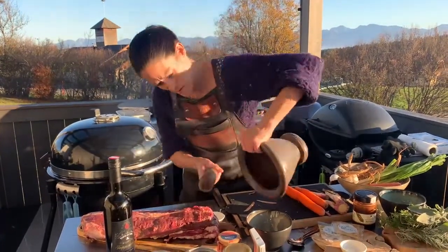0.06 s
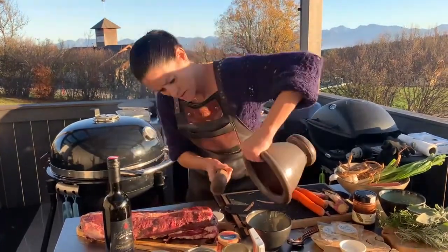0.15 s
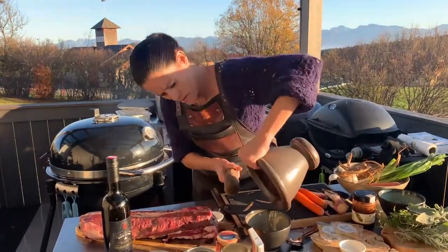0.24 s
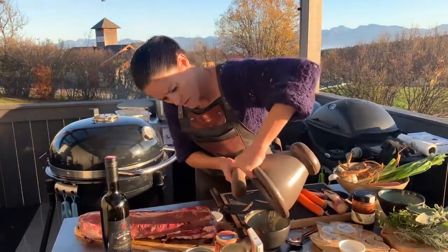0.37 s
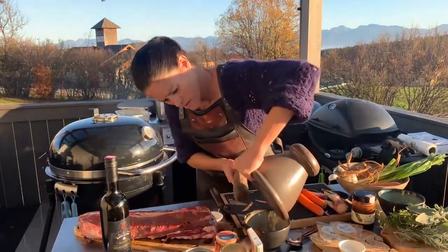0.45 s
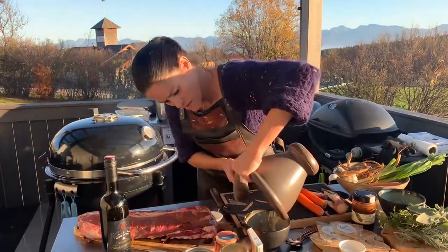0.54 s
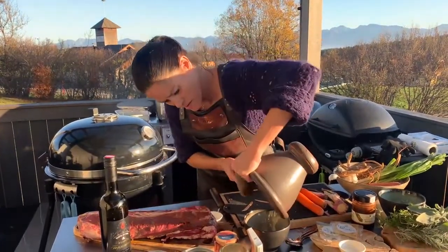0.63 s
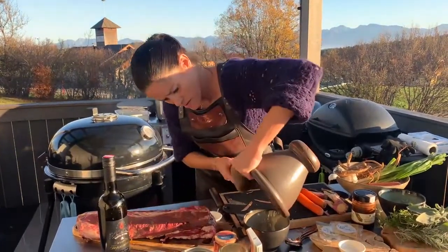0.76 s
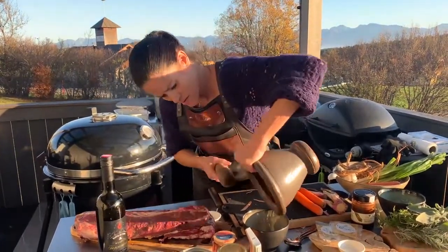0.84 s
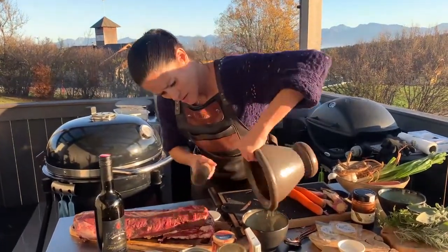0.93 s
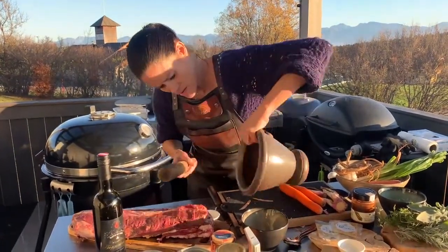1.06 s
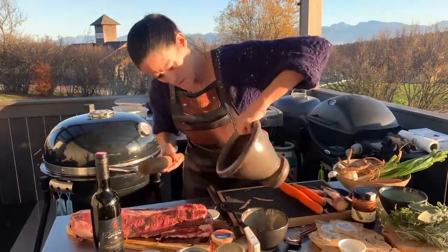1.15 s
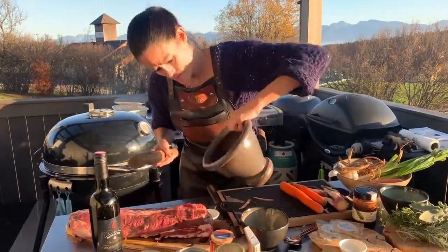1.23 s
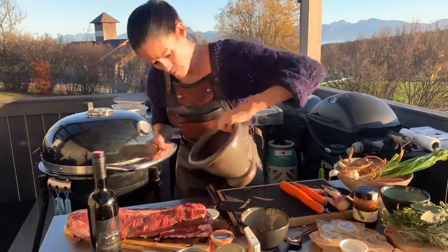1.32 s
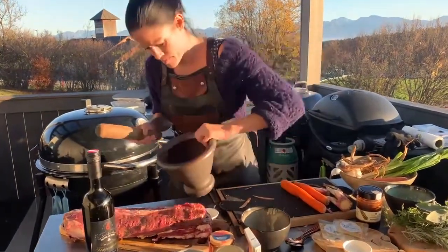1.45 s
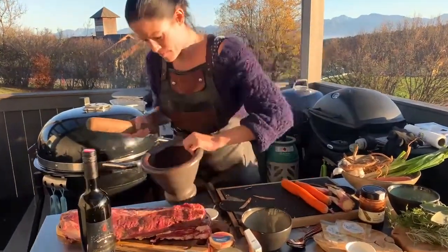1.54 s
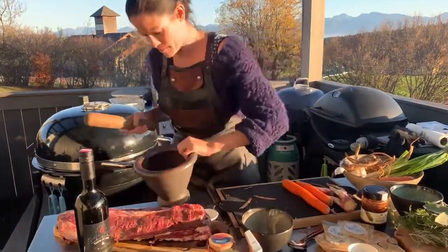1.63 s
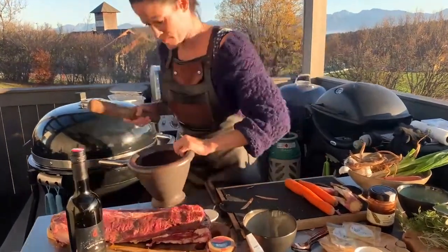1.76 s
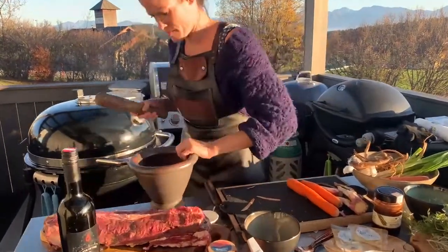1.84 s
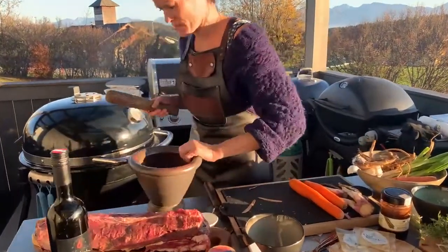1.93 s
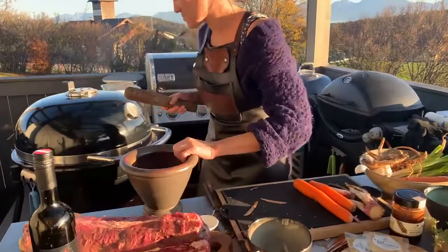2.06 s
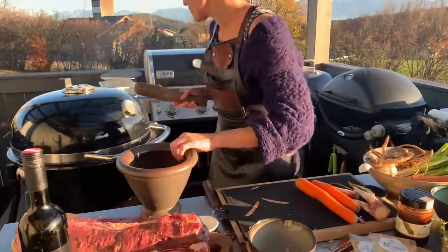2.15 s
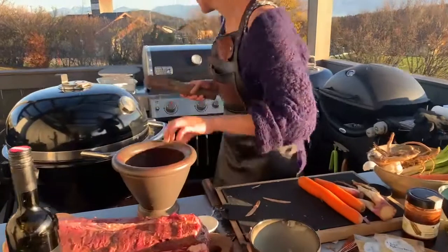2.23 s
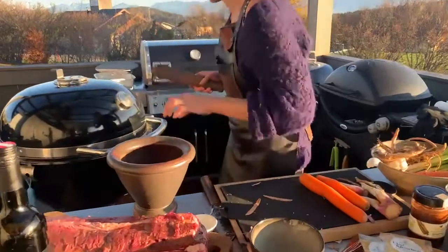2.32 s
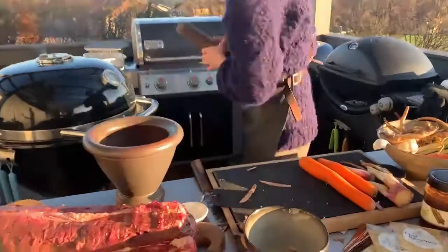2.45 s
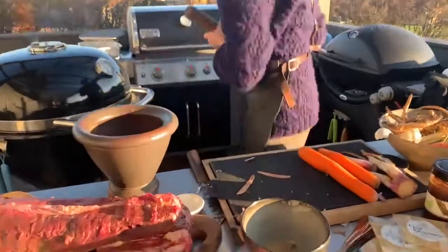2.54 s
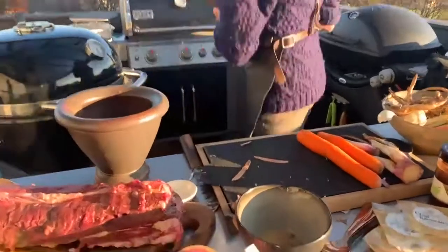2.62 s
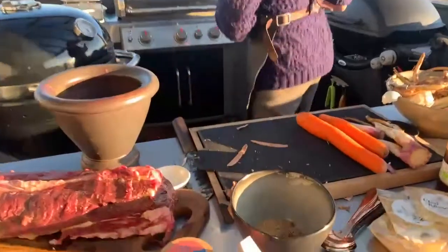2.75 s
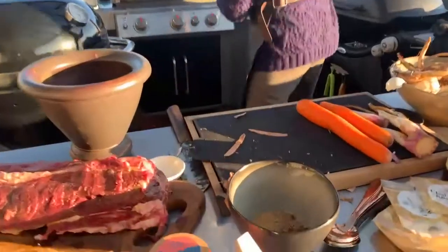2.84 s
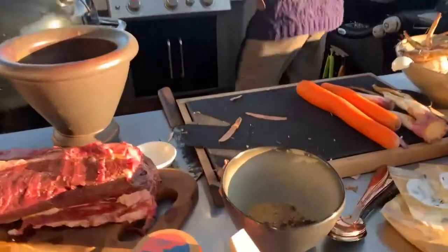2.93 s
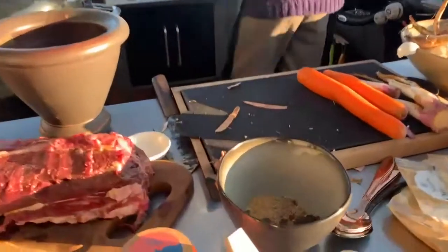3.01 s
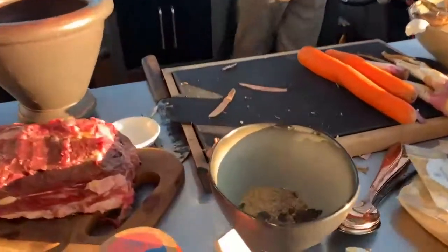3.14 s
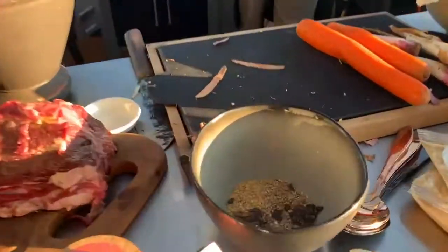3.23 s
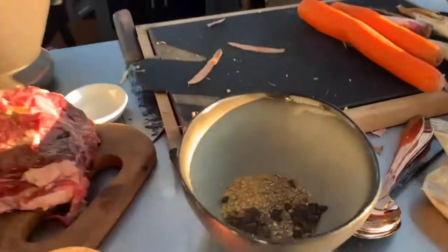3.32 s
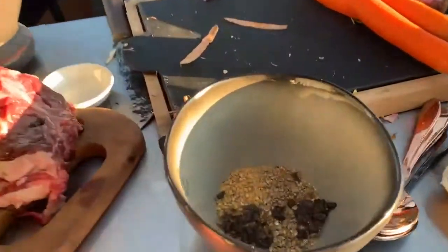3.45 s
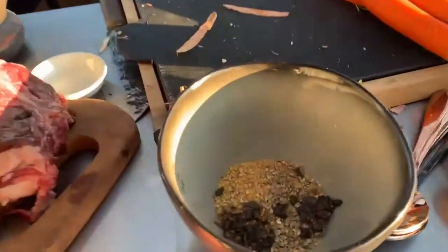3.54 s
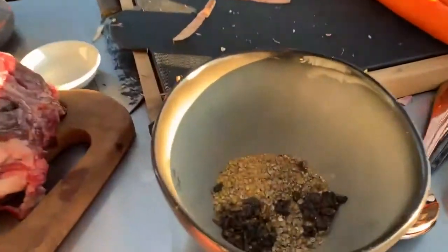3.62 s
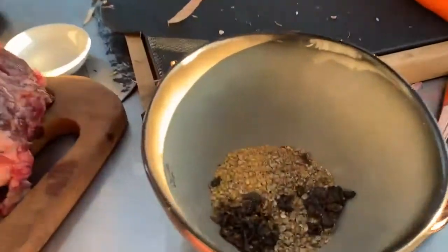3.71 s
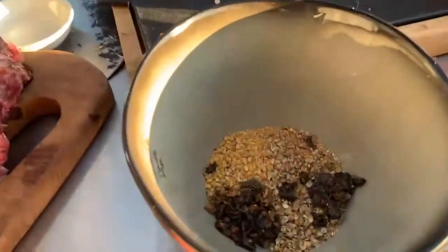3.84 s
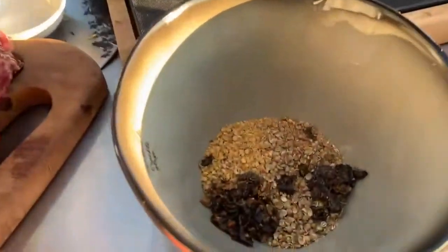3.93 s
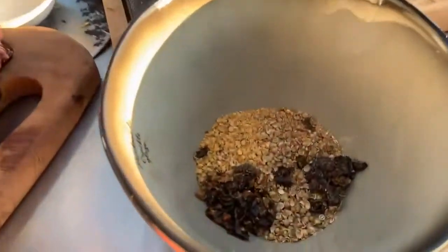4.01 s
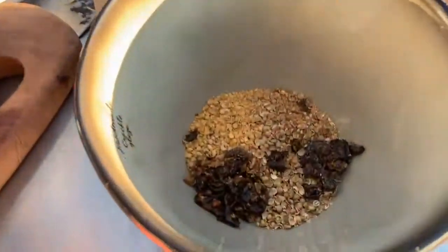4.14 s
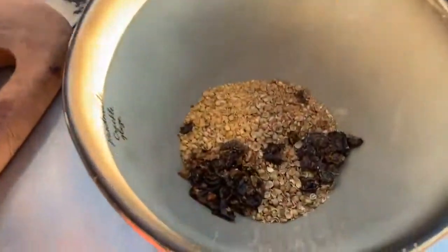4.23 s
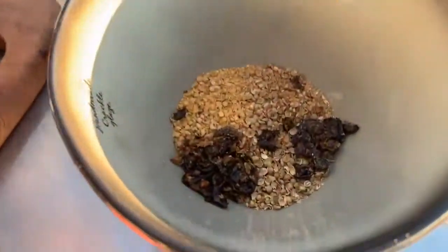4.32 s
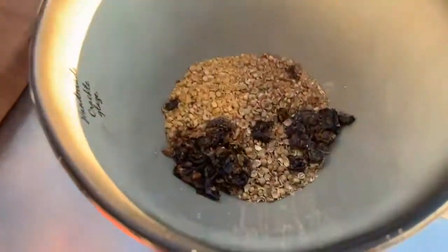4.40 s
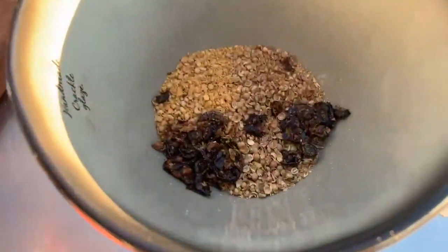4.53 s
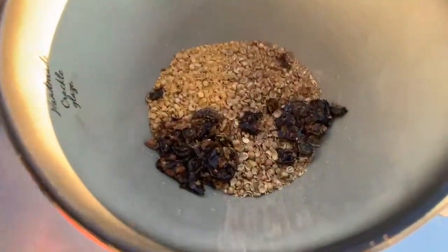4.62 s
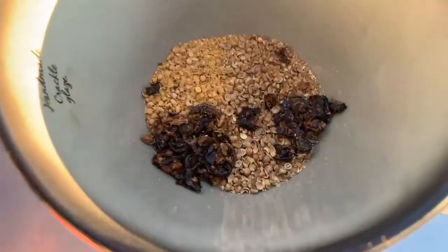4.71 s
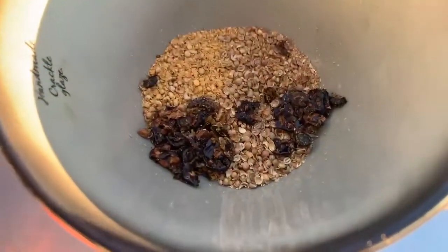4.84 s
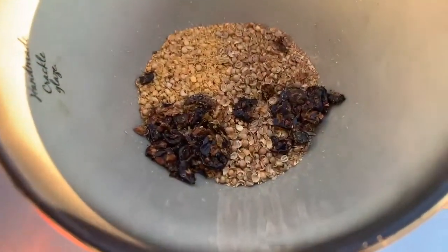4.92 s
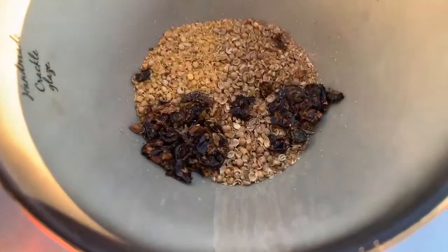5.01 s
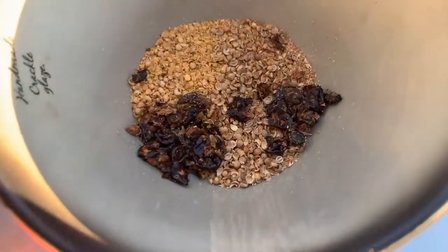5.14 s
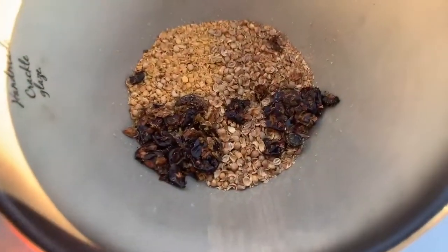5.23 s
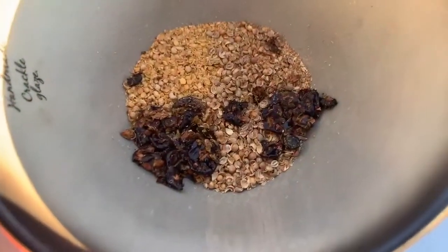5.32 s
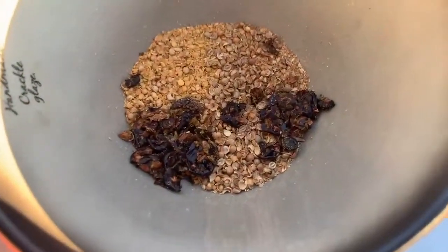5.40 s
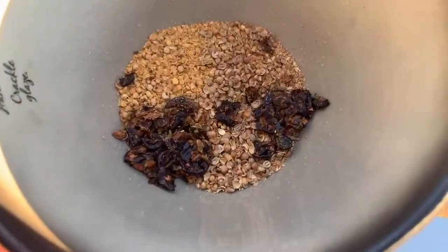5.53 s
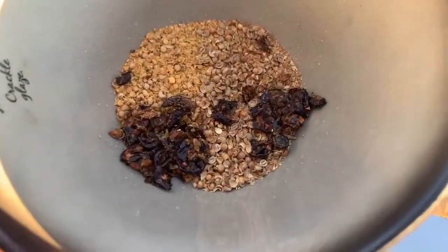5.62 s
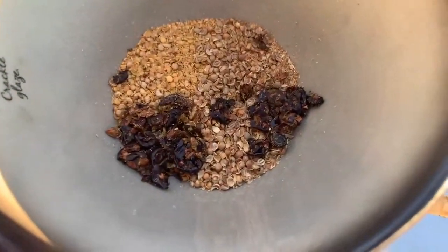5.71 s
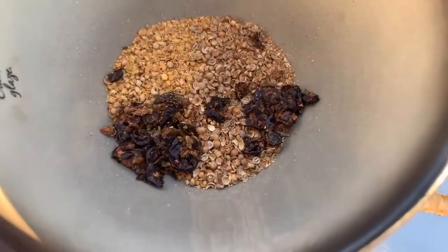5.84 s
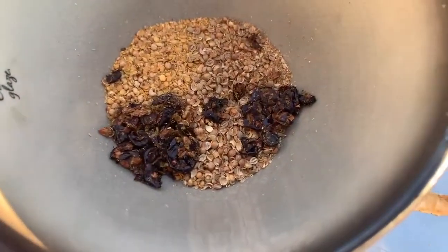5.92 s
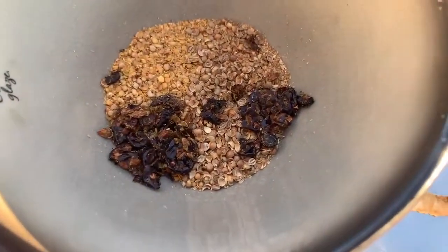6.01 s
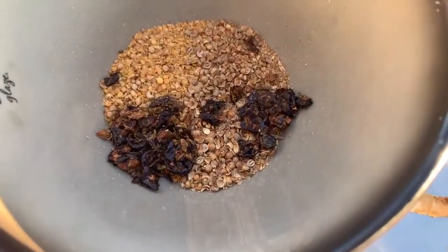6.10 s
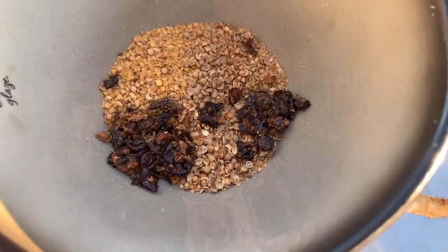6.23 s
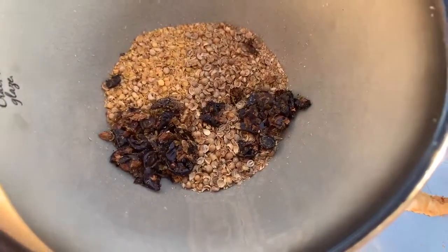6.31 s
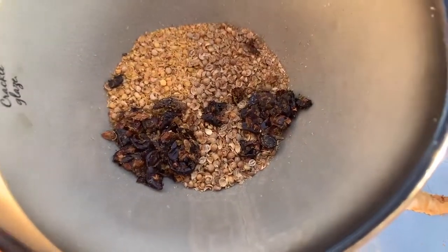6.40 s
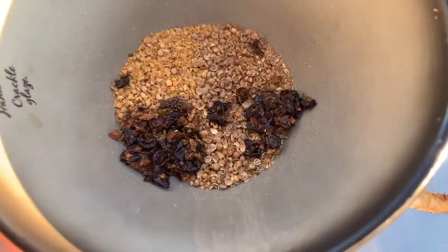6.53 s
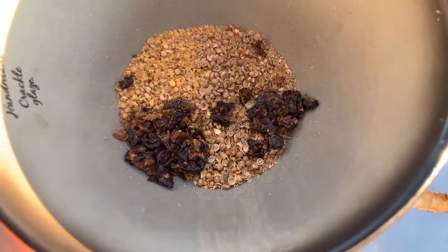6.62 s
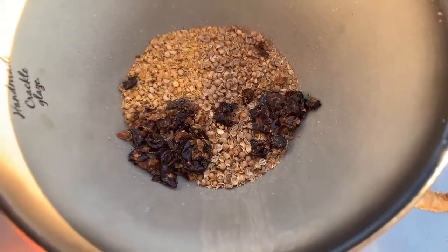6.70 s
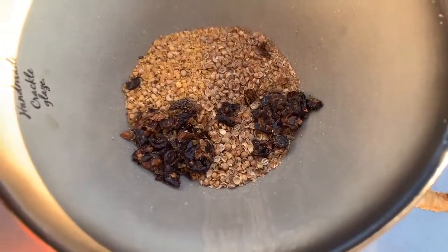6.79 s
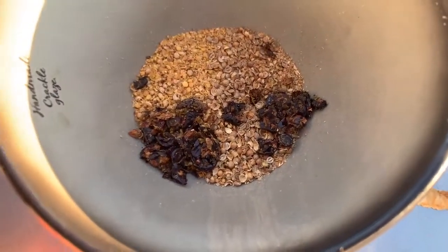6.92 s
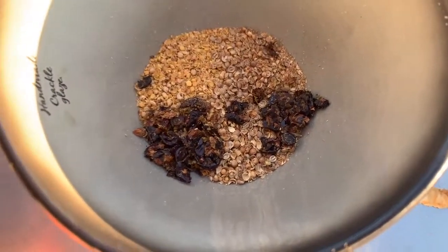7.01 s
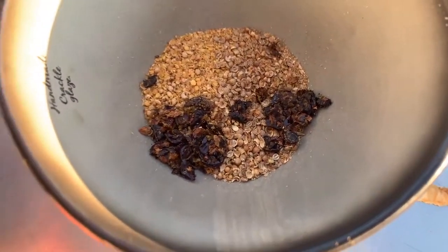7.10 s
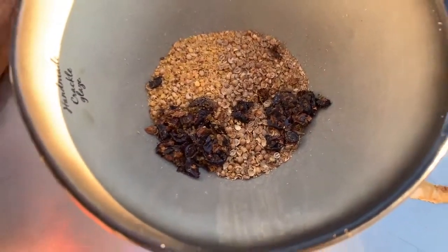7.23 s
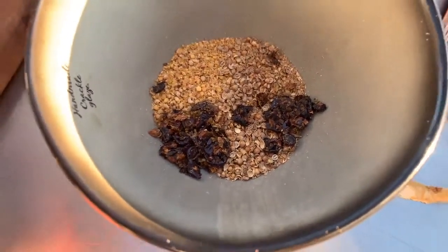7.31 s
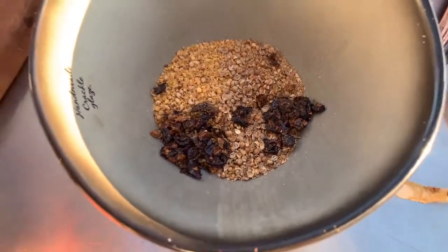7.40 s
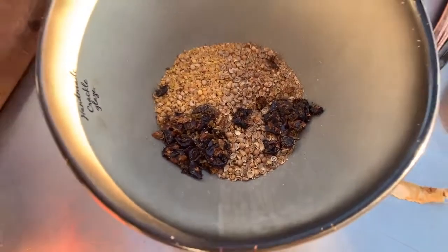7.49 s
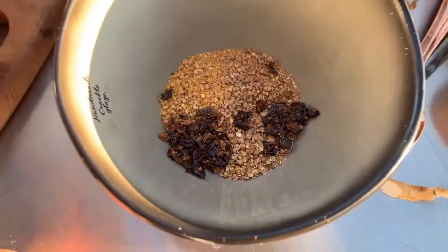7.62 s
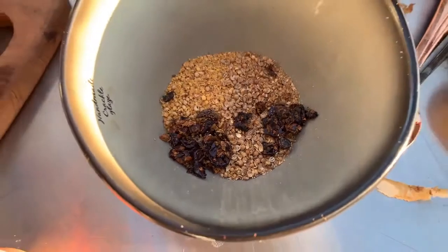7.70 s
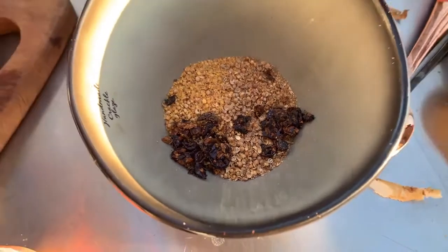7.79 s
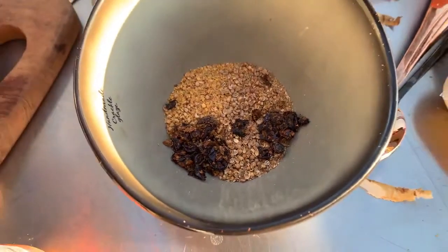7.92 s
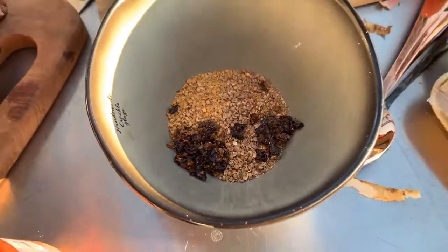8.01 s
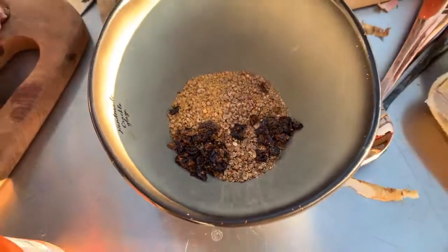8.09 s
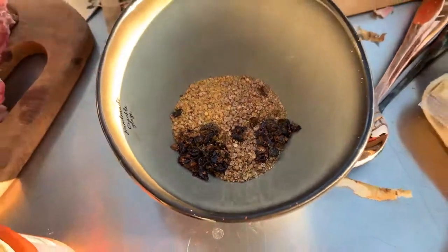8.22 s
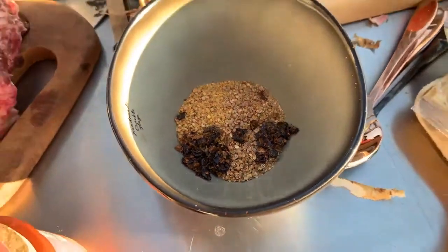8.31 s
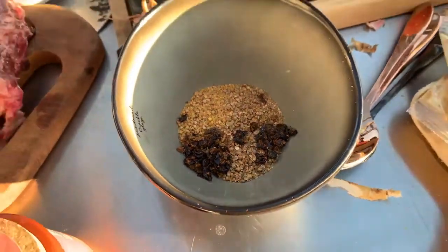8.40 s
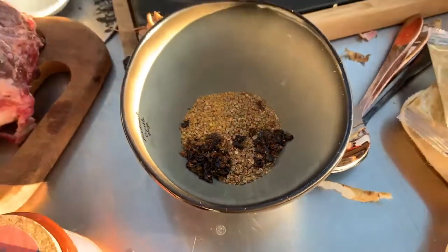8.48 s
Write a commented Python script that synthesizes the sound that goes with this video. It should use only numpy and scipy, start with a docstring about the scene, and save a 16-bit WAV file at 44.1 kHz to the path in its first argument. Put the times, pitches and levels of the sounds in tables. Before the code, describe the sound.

A pestle knocks loudly inside a stone mortar, stone grinds across a table, small clinks and footsteps follow, then quiet squealing rubs

```python
"""Stone mortar on a roofed deck

A pestle knocks ground spice out of a stone mortar over a bowl: hollow knocks with clacks and decaying modes.
The mortar is set down and dragged: swelling bursts of coloured noise scrape, while small things clink
as narrow noise bands and steps thud on the boards as dull ones. Then something near the microphone rubs
with a thin, fitful squeal of wavering tones and noise. A dull wash and hiss rise and fall in the background."""
import sys
import numpy as np
from scipy import signal
from scipy.fft import rfft, irfft, next_fast_len
from scipy.io import wavfile
from scipy.ndimage import uniform_filter1d, minimum_filter1d, map_coordinates

SR = 44100
rng = np.random.default_rng(int(sys.argv[2]) if len(sys.argv) > 2 else 0)


def dump_mix(stems):
    """Bounce the given channels to the path in sys.argv[1] as a 16-bit WAV at rate SR."""
    frames = np.atleast_2d(stems).T  # one column per channel
    limited = np.clip(frames, -1, 1)  # hard clip at full scale
    pcm = np.round(limited * 32767).astype(np.int16)
    wavfile.write(sys.argv[1], SR, pcm)


N = 377143
T = np.arange(SR) / SR  # time axis of one event, s

# background that swells after the louder sounds and with the handling, before trims:
# t/s, level of the dull wash/dB, level of the hiss/dB
BACKGROUND_LEVELS = [(0, -70.5, -92.5), (0.8, -68, -86), (0.98, -62.5, -83), (1.22, -72, -94.5),
                     (1.5, -62, -80), (2.22, -56, -79.5), (2.5, -65.5, -84.5), (2.8, -56, -81.5),
                     (3.08, -69, -92), (4.25, -58, -76.5), (4.55, -68, -87), (4.95, -71.5, -93),
                     (5.35, -64, -81.5), (6.35, -70.5, -88.5), (7.0, -62, -74.5), (7.72, -72, -90),
                     (8.25, -63.5, -77.5), (8.55, -65, -84)]
# spectrum of the dull wash: f/Hz, level/dB
WASH_SPECTRUM = [(15, -68), (25, -35.5), (91, -21.5), (186, -3.5), (256, -6.5), (328, -0.5), (403, -4.5),
                 (567, -3.5), (945, -12), (1020, -11.5), (1410, -15.5), (1640, -10.5), (2010, -17.5),
                 (2300, -25), (2990, -52.5), (5060, -120)]
# spectrum of the hiss: f/Hz, level/dB
HISS_SPECTRUM = [(1500, -2.5), (2500, 8), (4000, 3.5), (7000, -2), (10000, -12), (15000, -19.5)]

# knocks over the bowl: t/s, level/dB, low-pass corner set by hardness f/Hz, ring trim/dB, clack trim/dB
KNOCKS = [(0.373, -14, 4000, -0.5, -6.5), (0.514, -33.5, 7500, 3, 1), (0.526, -6, 7650, 0, 1),
          (0.563, -16, 3900, 0.5, -0.5), (0.706, -20.5, 920, -8.5, -10)]
# modes that ring after each knock: f/Hz, level/dB, t60/s
STONE_MODES = [(495.2, -8, 0.29), (591.9, -3.5, .21), (672, -13, 0.19), (777.5, -13.5, .26),
               (997, -22, .22), (1161, -8.5, 0.17), (1294, -2, 0.2), (1364, -1, .24), (1461, -14, 0.23),
               (1580, -6, 0.092), (1640, -4, 0.3), (1675, -7, 0.28), (1770, -12, 0.3), (2099, -26.5, 0.22),
               (3430, -23.5, 0.1), (4270, -26, 0.26), (4450, -26.5, .22), (5500, -31, .22)]
# spectrum of the clack: f/Hz, level/dB
CLACK_SPECTRUM = [(100, -40), (200, -25), (330, -16.5), (550, -0.5), (950, -8.5), (1350, 0.5), (1750, -3),
                  (2100, -20.5), (2800, -28.5), (4800, -36), (6200, -40), (8000, -41.5), (10000, -44),
                  (15000, -42)]
# decay of the clack: f/Hz, t60/s
CLACK_DECAY = [(200, 0.32), (700, .36), (1500, 0.3), (3000, 0.21), (6000, .2), (12000, 0.1)]
# clusters of high modes in the clack: f/Hz, full width at half the lift/Hz, lift/dB
HIGH_CLUSTERS = [(2380, 330, 5.5), (3330, 550, 12), (4260, 330, 18.5), (5510, 220, 16.5), (7324, 710, 7.5),
                 (8260, 170, 8.5)]

# brushing and scraping bands of noise: t/s, level/dB, centre f/Hz, width/octaves, rise/s, t60/s
BRUSH_EVENTS = [(0.938, -64.5, 2300, 1.04, .1, 0.29), (1.329, -64.5, 4000, 0.79, 0.07, 0.48),
                (1.99, -61, 9000, 0.89, 0.026, 0.092), (3.138, -49, 6950, 1, 0.037, 0.19),
                (3.31, -70, 5000, 0.87, 0.078, 0.27), (3.645, -33.5, 2880, 0.59, 0.033, 0.23),
                (3.87, -58, 2500, 1.18, 0.027, 0.46), (4.146, -40, 3010, 0.82, 0.023, 0.33),
                (6.93, -62, 3580, 0.95, 0.096, 0.27)]
# small utensils clink: t/s, level/dB, centre f/Hz, width/octaves, t60/s
CLINK_EVENTS = [(1.995, -42.5, 2400, .07, .17), (2.037, -43.5, 1990, 0.042, 0.24),
                (2.055, -53.5, 3730, 0.026, .25), (2.694, -47.5, 5980, 0.21, 0.022),
                (2.757, -52.5, 1810, 0.15, 0.37), (3.94, -54.5, 3260, 0.042, .12),
                (3.967, -47, 3550, .061, .025), (4.15, -40, 2480, .08, .06)]
# light bumps on the table top: t/s, level/dB, centre f/Hz, width/octaves, rise/s, t60/s
BUMP_EVENTS = [(1.997, -39, 510, 0.29, 0.0035, 0.39), (3.141, -54.5, 600, 1.13, 0.022, .8),
               (3.968, -44.5, 754, .6, .0016, 0.097), (4.101, -54, 1200, .7, 0.0016, 0.045),
               (4.179, -40.5, 724, 0.42, 0.018, 0.36)]
# something squeaks on the table: t/s, level/dB, rise/s
SQUEAK_EVENTS = [(2.39, -78, 0.032), (2.53, -70.5, 0.11)]
CLINK_RISE_S = 0.0034
BRUSH_EDGE = 3.4  # how steeply the band of a brush ends (2 = a bell)
SQUEAK_HZ, SQUEAK_OCTAVES, SQUEAK_T60_S = 7510, .02, 0.3

# heavy things scrape on the table:
# t/s, level/dB, rise/s, hold/s, reference t60/s, tilt/dB per octave, midrange lift/dB
SCRAPE_EVENTS = [(1.506, -16, 0.025, 0.0028, 0.33, 0, 2), (1.68, -16.5, 0.026, 0.0081, 0.37, 0.67, -0.5),
                 (1.744, -27, 0.015, 0.048, 0.22, -2.04, 0), (1.97, -39, 0.00097, 0.00086, 0.089, -4, -9),
                 (1.985, -39, 0.0088, 0.018, 0.23, -2.5, -9), (2.038, -45.5, 0.0031, 0.0065, 0.46, -4, -6),
                 (3.636, -29.5, 0.031, 0.0069, 0.24, 1.53, -14.5)]
# spectrum of the grit: f/Hz, level/dB
GRIT_SPECTRUM = [(29, -74), (50, -42), (166, -12.5), (282, -7), (367, -7), (637, -3.5), (701, -10.5),
                 (753, -7), (829, -8), (1920, -9.5), (3580, -16.5), (4560, -20), (6230, -24), (12500, -33),
                 (15500, -37.5)]
# how long the grit lasts: f/Hz, share of the reference t60
GRIT_DECAY_SHARE = [(150, 1.6), (500, 1.04), (1500, 0.95), (4000, 0.92), (12000, .75)]
# modes of the table: f/Hz, full width at half the lift/Hz, lift/dB
TABLE_MODES = [(181, 16, 1.5), (234, 41, 5.5), (284, 13, 6), (553.7, 89, 0.5), (1379, 39, 1.5),
               (1920, 44, 5.5), (3050, 94, 4), (4090, 53, 7.5)]

# thuds on the deck: t/s, level/dB, corner f/Hz, t60/s, boom relative to level/dB, boom corner f/Hz
THUD_EVENTS = [(2.518, -38.5, 300, 0.16, -9, 300), (2.609, -34.5, 804, 0.16, -2, 280),
               (2.715, -48, 400, 0.1, -19, 210), (3.235, -37, 855, 0.15, -10, 250),
               (3.655, -35, 496.7, 0.16, -5, 170), (4.19, -47.5, 520, 0.48, -13, 300),
               (7.949, -57.5, 117, 0.11, -20, 110), (8.128, -41.5, 480, 0.24, 3.5, 112)]
# spectrum of the boards: f/Hz, level/dB
BOARD_SPECTRUM = [(25, -67), (60, -33), (130, -3.5), (260, 2), (450, 3), (900, 1), (3000, -2)]
BOOM_DELAY_S, BOOM_T60_S = .011, .2  # the joists answer just after the boards

# strokes of the rubbing, before trims:
# t/s, length/s, low ring level/dB, middle ring level/dB, high ring level/dB, rasp level/dB
RUB_STROKES = [(4.655, .015, -72, -71, -95, -108), (4.709, 0.049, -67.5, -62, -81, -108),
               (4.995, .04, -76.5, -68.5, -92, -108), (5.058, .04, -65, -48, -65, -99),
               (5.098, 0.027, -47, -48.5, -57, -97), (5.21, 0.017, -53.5, -73, -89, -106),
               (5.271, 0.088, -47.5, -56, -70.5, -102), (5.372, 0.056, -60, -53, -64.5, -98),
               (5.511, 0.018, -66.5, -52.5, -92, -103), (5.562, 0.064, -45.5, -53.5, -68.5, -93),
               (5.806, 0.034, -57, -68, -82, -106), (6.008, .055, -70, -56.5, -88, -94),
               (6.153, .045, -55.5, -54.5, -57, -93), (6.231, 0.017, -67, -58.5, -82, -102),
               (6.457, 0.039, -47.5, -67, -82, -92.5), (6.498, 0.048, -46, -49.5, -66, -77),
               (6.708, .105, -58, -54.5, -63, -74.5), (6.911, 0.074, -55, -56.5, -69.5, -77),
               (7.005, 0.041, -55.5, -56, -59, -90), (7.435, .012, -50.5, -61, -90, -105),
               (7.48, 0.1, -62.5, -58, -66.5, -93), (7.881, 0.11, -62, -50.5, -73.5, -96),
               (8.005, 0.025, -72, -64, -57, -75.5), (8.065, 0.083, -66.5, -64, -60.5, -70),
               (8.191, 0.031, -60.5, -41.5, -66, -68.5), (8.266, .03, -63, -67, -66, -88),
               (8.431, 0.082, -50, -52.5, -69.5, -86)]
# squealing resonances: f/Hz, waver scale/Hz, noise half-width/Hz, noise relative to the tone/dB
SQUEAL_RINGS = [(2731, 21.7, 90, -5), (4979, 26.2, 182, -6.5), (7600, 70, 183, 2)]
# bands of the dry rasp: f/Hz, full width at half gain/Hz, level before trims/dB
RASP_BANDS = [(6800, 2100, -2), (9280, 320, -6.5), (10570, 350, -8), (11600, 260, -0.5), (12900, 380, -3.5),
              (14650, 600, -8)]
GRIP_T60_S, RELEASE_T60_S = 0.066, 0.14  # a stroke takes hold and lets go
LIGHT_DB, APPROACH_T60_S, LINGER_T60_S = -22, 0.46, 3.05  # the light contact before and after it

TOP_HZ = 15750  # middle of the upper band edge


def amp(db):
    """Decibels to gain."""
    return 10 ** (np.asarray(db) / 20)


def unit(x):
    """Scaled to rms 1."""
    return x / np.sqrt(np.mean(x ** 2) + 1e-20)


def along(points, hz):
    """(Hz, value) points read on a log frequency axis."""
    f, v = np.transpose(points)
    return np.interp(np.log(hz + 1), np.log(f + 1), v)


def curves(rows):
    """One value per sample for each column after the time."""
    s, *cols = np.transpose(rows)
    return [np.interp(np.arange(N) / SR, s, c) for c in cols]


def wobble(rate, size=N):
    """A smooth random curve, rate knots a second."""
    knots = rng.standard_normal(int(size * rate / SR) + 4)
    return map_coordinates(knots, [np.arange(size) * rate / SR])


def noise(gain, size):
    """Noise of rms 1 coloured by a gain of frequency."""
    m = next_fast_len(size)
    spectrum = rfft(rng.standard_normal(m)) * gain(np.fft.rfftfreq(m, 1 / SR))
    return unit(irfft(spectrum, m)[:size])


def steady(x, span):
    """Evens out the chance swells of a noise that are slower than span seconds."""
    power = uniform_filter1d(x * x, max(int(span * SR), 2))
    return x / np.sqrt(np.abs(power) + 1e-9)


def dying(x, t60, wait):
    """After wait seconds each frequency of x dies with its own t60."""
    hz, t, z = signal.stft(x, SR, nperseg=256)
    fade = amp(-60 * np.maximum(t - wait, 0) / t60(hz)[:, None])
    return signal.istft(z * fade, SR, nperseg=256)[1][:len(x)]


def swell(rise):
    """An attack that grows as time squared to 1 in rise seconds."""
    return np.minimum(T / rise, 1) ** 2


def add(track, s, x):
    """Mixes x into the track at s seconds."""
    part = track[max(round(s * SR), 0):][:len(x)]
    part += x[:len(part)]


def lift(resonances, f):
    """The dB that (Hz, width, dB) resonances add at frequencies f."""
    return sum(db * np.exp2(-(2 * (f - hz) / width) ** 2) for hz, width, db in resonances)


def ripple(f, spacing_hz):
    """A random run of peaks and dips over frequency, for an uneven colour."""
    return map_coordinates(rng.standard_normal(2048), [f / spacing_hz], mode="mirror")


def high_pass(x, hz):
    """Takes away the bass below hz."""
    return signal.sosfilt(signal.butter(3, hz, "high", fs=SR, output="sos"), x)


def background(wash_trim_db=0.0, hiss_trim_db=5.0, drift_db=0.5):
    """A dull wash and a hiss above it that swell after the louder sounds and with the handling."""
    wash_db, hiss_db = curves(BACKGROUND_LEVELS)
    wash_gain = amp(wash_db + wash_trim_db + drift_db * wobble(11))
    wash = wash_gain * noise(lambda f: amp(along(WASH_SPECTRUM, f)), size=N)
    hiss = amp(hiss_db + hiss_trim_db) * noise(lambda f: amp(along(HISS_SPECTRUM, f)), size=N)
    return wash + hiss


def taps(ring_db=-3.5, clack_db=-5.5, knock_db=2, knock_hz=560, knock_t60=.036,
         echo_s=.0155, echo_db=-2, blur=.42, low_hz=210):
    """Each blow gives a hollow stone knock, a clack and a ring; each has its own treble corner."""
    out = np.zeros(N)
    hz, level, t60 = np.transpose(STONE_MODES)[:, :, None]
    for s, db, corner_hz, ring_trim_db, clack_trim_db in KNOCKS:
        start_phase = rng.uniform(0, 2 * np.pi, hz.shape)
        # reflections blur the phase of the modes, the high ones most
        drift = np.array([wobble(120, size=SR) for _ in STONE_MODES])
        phase = start_phase + blur * hz / 1500 * drift
        mode_gain = amp(level + rng.normal(0, 1, hz.shape) - 60 * T / t60)
        ring = (mode_gain * np.sin(2 * np.pi * hz * T + phase)).sum(0)
        burst = noise(lambda f: amp(along(CLACK_SPECTRUM, f) + lift(HIGH_CLUSTERS, f)), size=SR)
        clack = dying(steady(burst, .02), lambda f: along(CLACK_DECAY, f), 0)
        knock = amp(knock_db - 60 * T / knock_t60) * np.sin(2 * np.pi * knock_hz * T) * swell(0.0026)
        bright = amp(ring_db + ring_trim_db) * ring + amp(clack_db + clack_trim_db) * clack
        blow = bright * swell(0.0049) + knock
        add(blow, echo_s, amp(echo_db) * knock)  # the roof throws the knock back
        softened = signal.lfilter(*signal.butter(3, corner_hz, fs=SR), blow)
        add(out, s, amp(db) * softened)
    return high_pass(out, low_hz)  # the knocks carry no deep bass


def touch(hz, octaves, rise, t60, ripple_db, edge=2):
    """A light contact sounds as an uneven band of noise around hz: it swells, then dies."""
    def gain(f):
        distance = np.abs(np.log2((f + 1) / hz) / octaves)
        return np.exp(-.5 * distance ** edge) * amp(ripple_db * ripple(f, 90))

    decay = amp(-60 * np.maximum(T - rise, 0) / t60)
    return steady(noise(gain, size=SR), .015) * swell(rise) * decay


def clinks(ripple_db=4.0, grain_db=1.5, grain_rate=160):
    """Utensils clink, bands of noise brush and scrape, the table top is bumped and something squeaks."""
    out = np.zeros(N)
    for s, db, hz, octaves, t60 in CLINK_EVENTS:
        add(out, s, amp(db) * touch(hz, octaves, CLINK_RISE_S, t60, ripple_db))
    for s, db, hz, octaves, rise, t60 in BRUSH_EVENTS:
        add(out, s, amp(db) * touch(hz, octaves, rise, t60, ripple_db, BRUSH_EDGE))
    for s, db, hz, octaves, rise, t60 in BUMP_EVENTS:
        add(out, s, amp(db) * touch(hz, octaves, rise, t60, ripple_db))
    for s, db, rise in SQUEAK_EVENTS:
        add(out, s, amp(db) * touch(SQUEAK_HZ, SQUEAK_OCTAVES, rise, SQUEAK_T60_S, ripple_db))
    return out * amp(grain_db * wobble(grain_rate))


def scrapes(grain_db=1.5, grain_rate=450, tail_db=-34, tail_t60=1.7, mid_hz=1100, low_hz=95, ripple_db=1.4):
    """Stone grinds on grit: a dense crunch swells, shakes the table's modes and dies from the top down."""
    out = np.zeros(N)

    def colour_db(f):
        return along(GRIT_SPECTRUM, f) + lift(TABLE_MODES, f)

    def midrange(f):
        return np.exp(-(np.log2((f + 1) / mid_hz) / 0.97) ** 2)

    for s, db, rise, hold, t60, tilt, mid_db in SCRAPE_EVENTS:
        def contact_db(f):
            return tilt * np.log2(f + 1) + mid_db * midrange(f) + ripple_db * ripple(f, 45)

        grit = steady(noise(lambda f: amp(colour_db(f) + contact_db(f)), size=SR), 0.025)
        crunch = dying(grit, lambda f: t60 * along(GRIT_DECAY_SHARE, f), rise + hold)
        dull = noise(lambda f: amp(colour_db(f)) / np.hypot(1, f / 900), size=SR)
        tail = dull * amp(tail_db - 60 * T / tail_t60)  # under the roof
        add(out, s, amp(db) * swell(rise) * (crunch + tail))
    return high_pass(out * amp(grain_db * wobble(grain_rate)), low_hz)


def thuds(low_hz=68):
    """Soft, heavy contacts shake the boards, then the joists boom."""
    out = np.zeros(N)

    def shake(db, corner_hz, t60):
        boards = noise(lambda f: amp(along(BOARD_SPECTRUM, f)) / np.hypot(1, (f / corner_hz) ** 3), size=SR)
        return steady(boards, 0.042) * swell(0.0036) * amp(db - 60 * T / t60)

    for s, db, corner_hz, t60, boom_db, boom_hz in THUD_EVENTS:
        add(out, s, shake(db, corner_hz, t60))
        add(out, s + BOOM_DELAY_S, shake(db + boom_db, boom_hz, BOOM_T60_S))
    return high_pass(out, low_hz)


def stroke_levels():
    """Gains of the rings and rasp: each stroke grips, holds and lets go, with light contact around it."""
    power = np.zeros((len(SQUEAL_RINGS) + 1, N))
    lead = .25  # s of approach kept before each stroke
    t = np.arange(2 * SR) / SR - lead
    for s, length, *levels_db in RUB_STROKES:
        before, after = np.maximum(-t, 0), np.maximum(t - length, 0)
        firm = amp(-60 * (before / GRIP_T60_S + after / RELEASE_T60_S))
        light = amp(LIGHT_DB - 60 * (before / APPROACH_T60_S + after / LINGER_T60_S))
        for track, db in zip(power, levels_db):
            add(track, s - lead, (amp(db) * np.maximum(firm, light)) ** 2)
    return np.sqrt(power)


def rubbing(squeal_db=-2.5, flutter_db=4.0, flutter_rate=75, waver_rate=130, rasp_db=-6,
            grain_db=5, grain_rate=60, tick_db=5.5, tick_rate=110):
    """Stick and slip sets three resonances singing by turns; some strokes add a dry, crackling rasp."""
    *rings, rasp = stroke_levels()
    out = np.zeros(N)
    for (hz, waver_hz, width_hz, noise_db), ring in zip(SQUEAL_RINGS, rings):
        pitch_hz = hz + waver_hz * wobble(waver_rate)
        tone = unit(np.sin(2 * np.pi * np.cumsum(pitch_hz) / SR))
        slips = noise(lambda f: 1 / (1 + np.abs((f - hz) / width_hz) ** 3), size=N)
        flutter = amp(squeal_db + flutter_db * wobble(flutter_rate))
        out += ring * flutter * unit(tone + amp(noise_db) * slips)
    ticks_db = tick_db * wobble(tick_rate)  # shared by all rasp bands
    for hz, width, db in RASP_BANDS:
        band = noise(lambda f: 1 / (1 + ((f - hz) / width * 2) ** 2), size=N)
        crackle = amp(rasp_db + db + ticks_db + grain_db * wobble(grain_rate))
        out += rasp * crackle * band
    return out


def scene():
    """All sources at one microphone."""
    return (taps() + scrapes() + thuds() + clinks() + rubbing() + background())[None]


def record(dry):
    """The camera limits the highest peaks and keeps nothing above its band limit."""
    ceiling = .89
    needed = np.minimum(1, ceiling / (np.abs(dry) + 1e-9))
    gain = uniform_filter1d(minimum_filter1d(needed, size=301), size=301)  # held, then smoothed
    m = next_fast_len(N + SR // 2)
    band = np.clip((TOP_HZ - np.fft.rfftfreq(m, 1 / SR)) / 300 + .5, 0, 1)  # edge 300 Hz wide
    return irfft(rfft(dry * gain, m) * band, m)[..., :N]


dry = scene()
out = record(dry)
dump_mix(out)
```